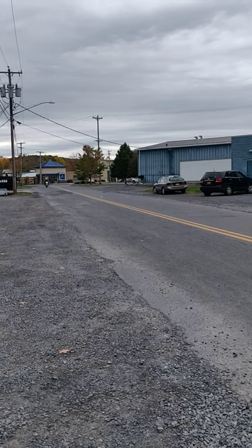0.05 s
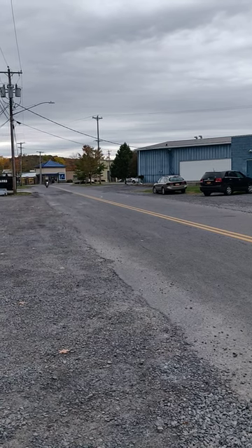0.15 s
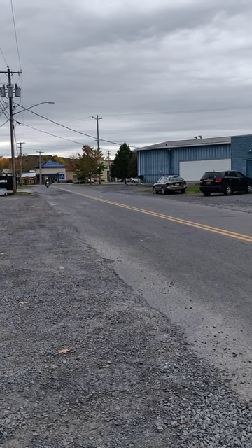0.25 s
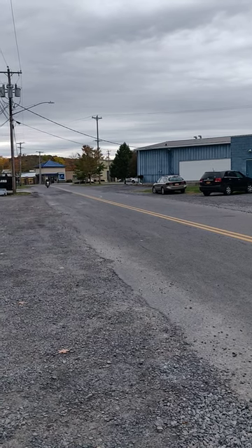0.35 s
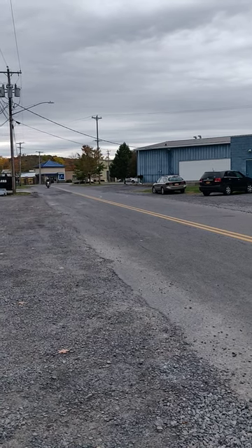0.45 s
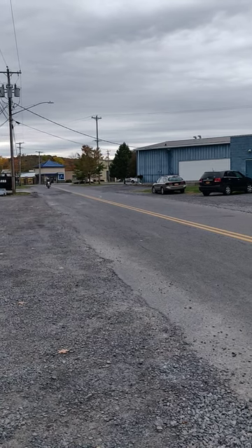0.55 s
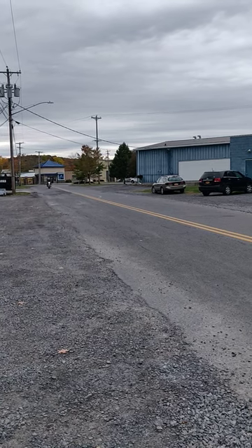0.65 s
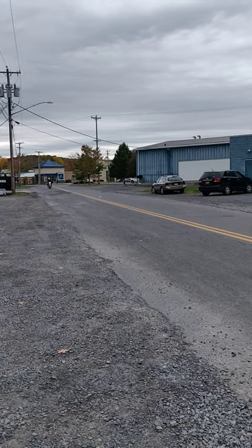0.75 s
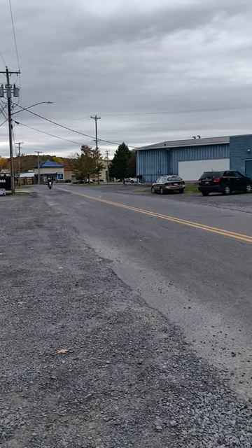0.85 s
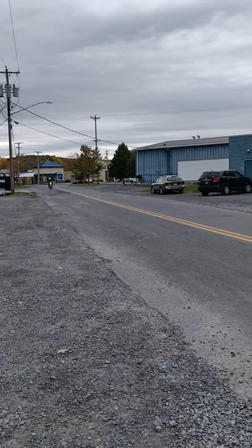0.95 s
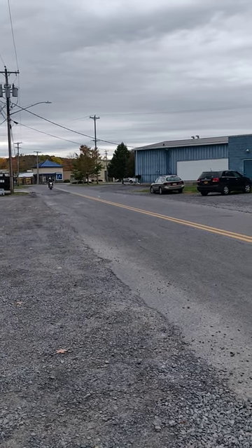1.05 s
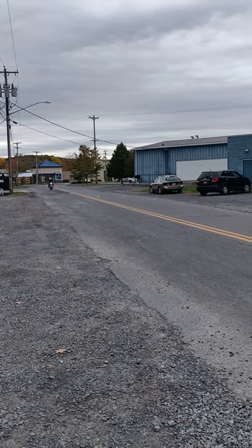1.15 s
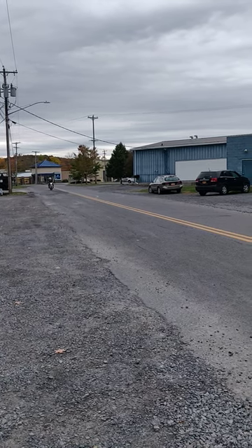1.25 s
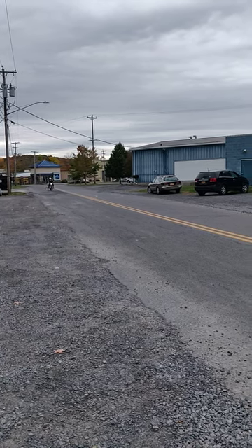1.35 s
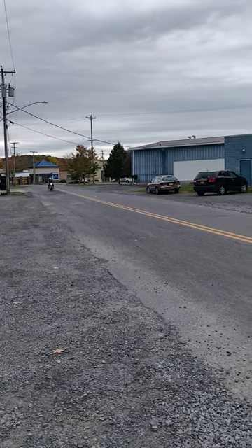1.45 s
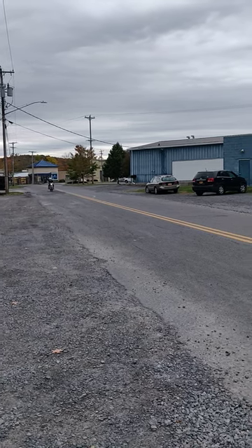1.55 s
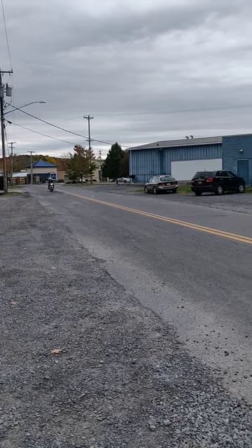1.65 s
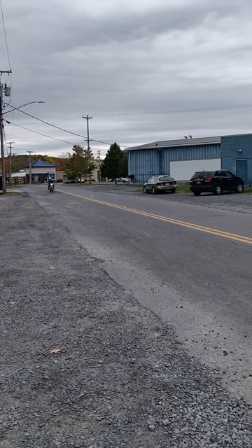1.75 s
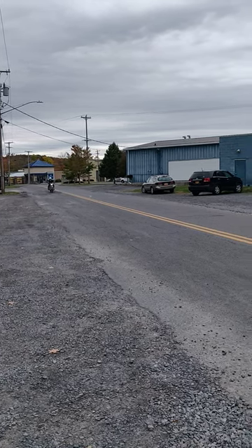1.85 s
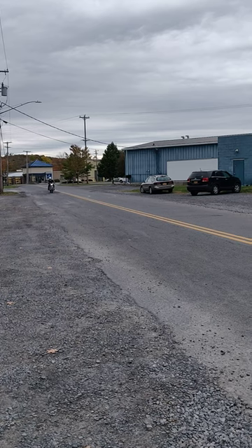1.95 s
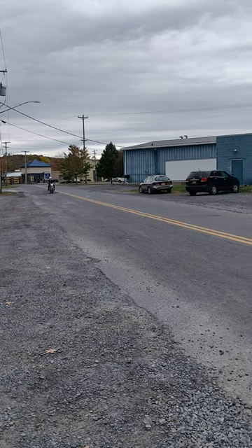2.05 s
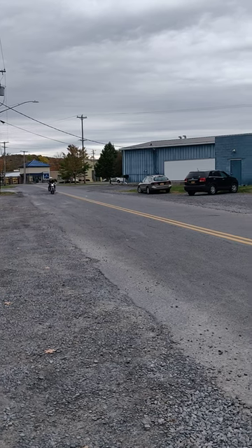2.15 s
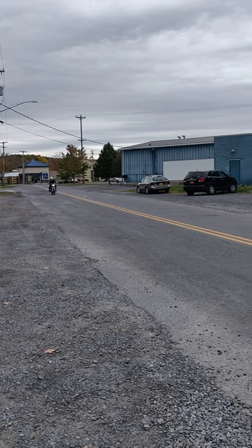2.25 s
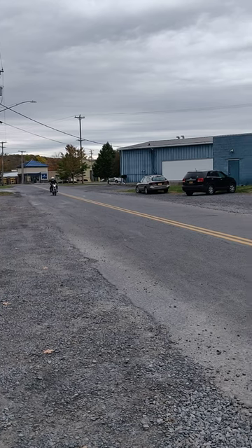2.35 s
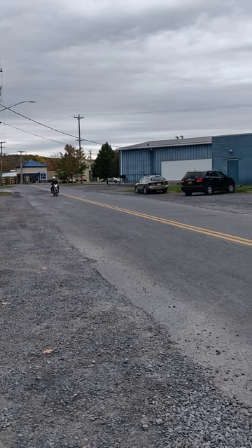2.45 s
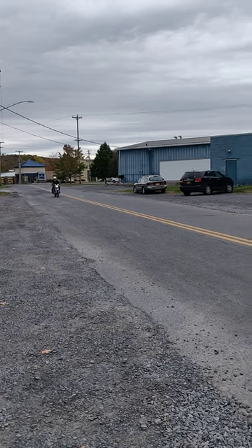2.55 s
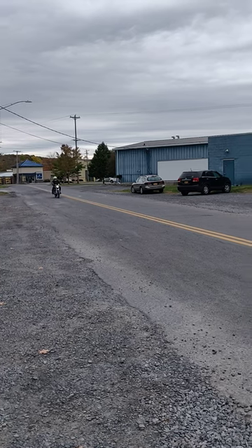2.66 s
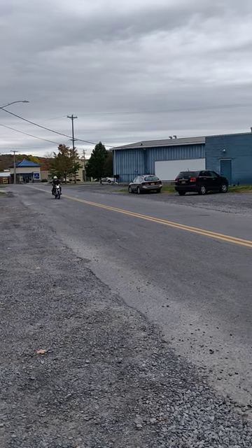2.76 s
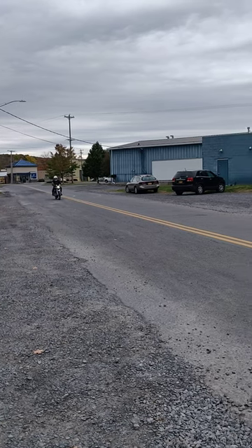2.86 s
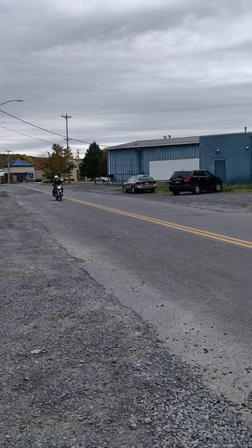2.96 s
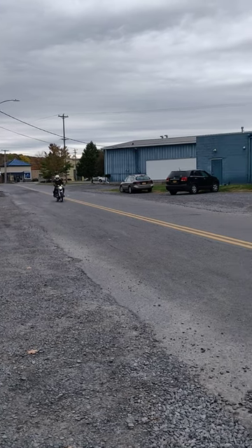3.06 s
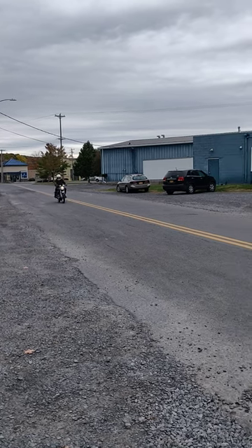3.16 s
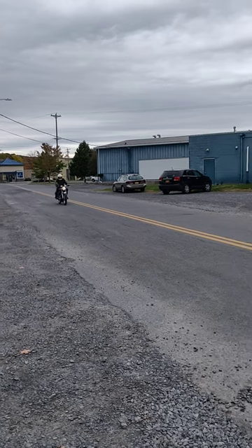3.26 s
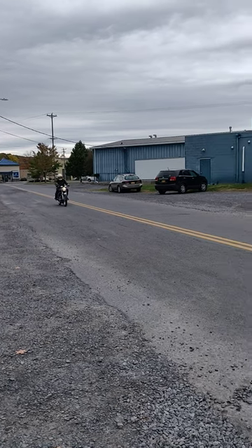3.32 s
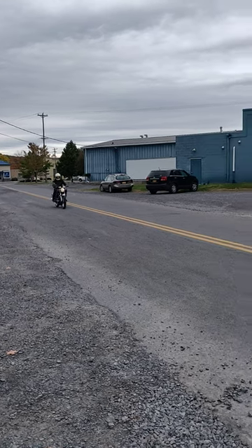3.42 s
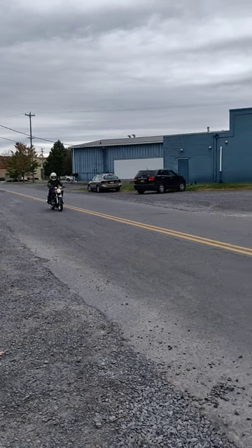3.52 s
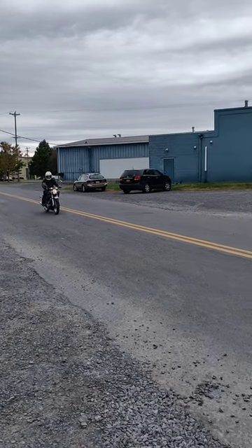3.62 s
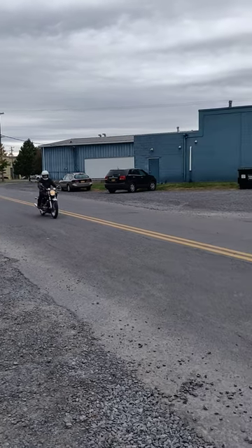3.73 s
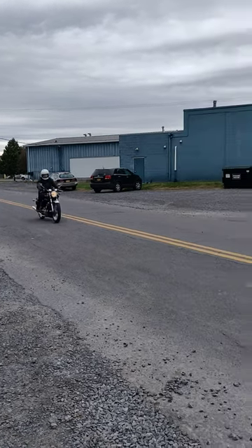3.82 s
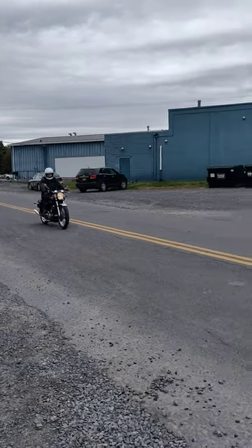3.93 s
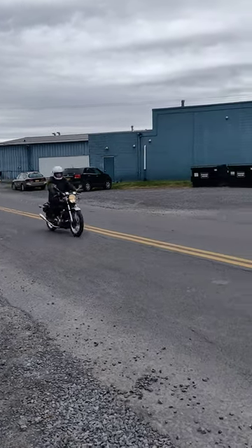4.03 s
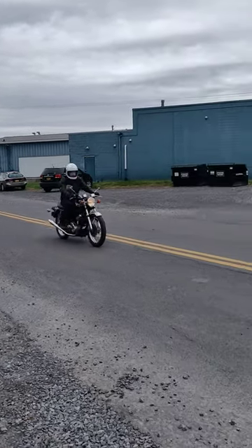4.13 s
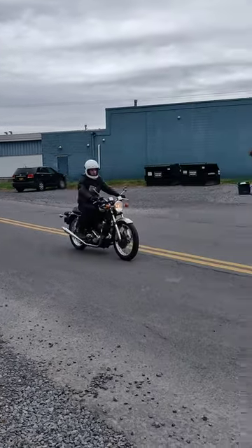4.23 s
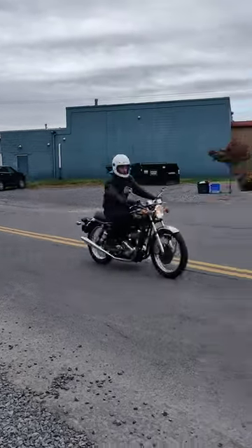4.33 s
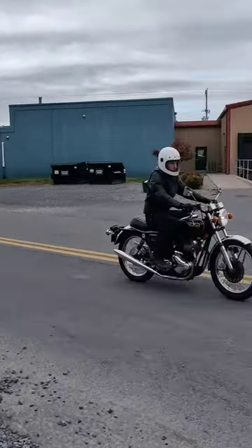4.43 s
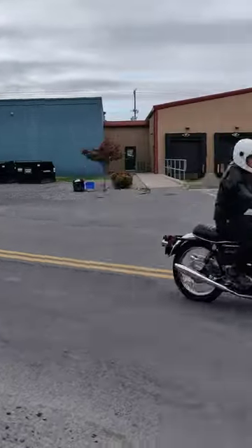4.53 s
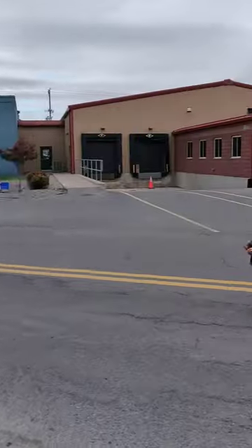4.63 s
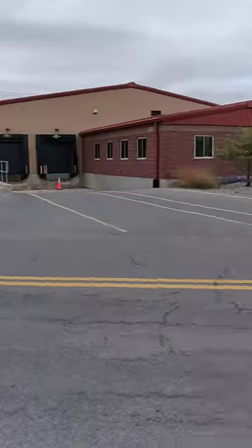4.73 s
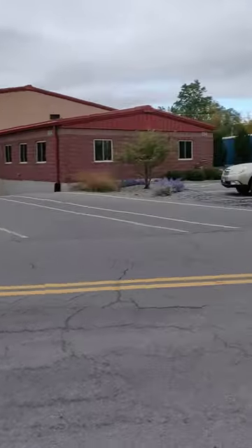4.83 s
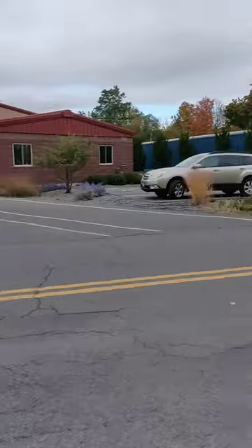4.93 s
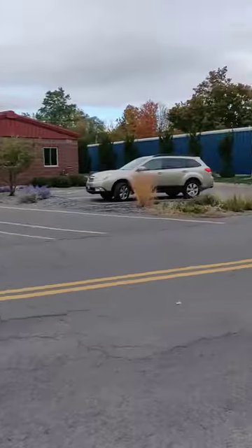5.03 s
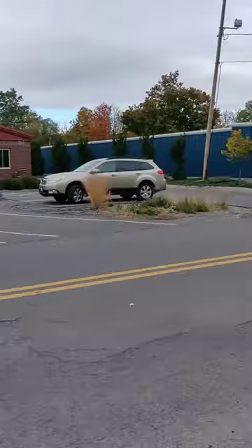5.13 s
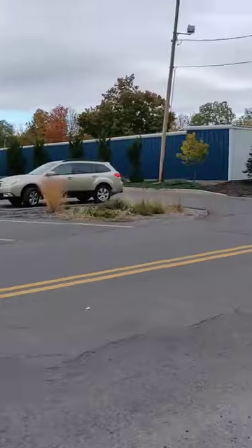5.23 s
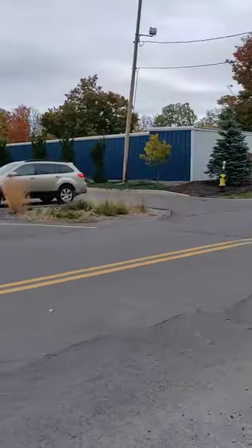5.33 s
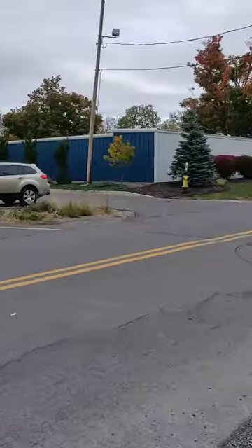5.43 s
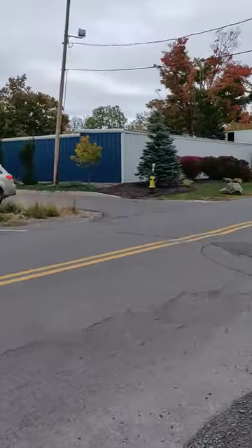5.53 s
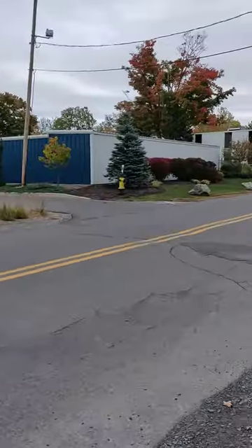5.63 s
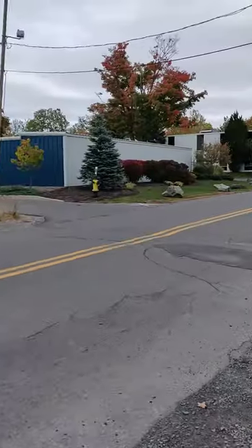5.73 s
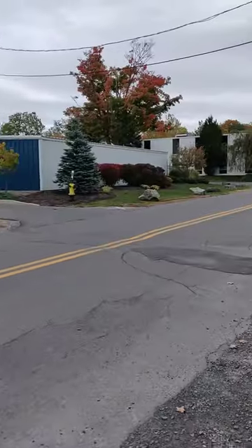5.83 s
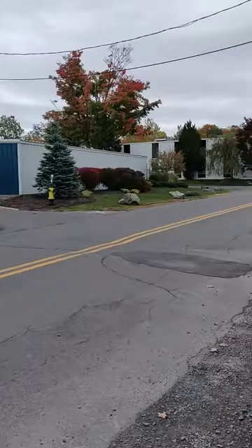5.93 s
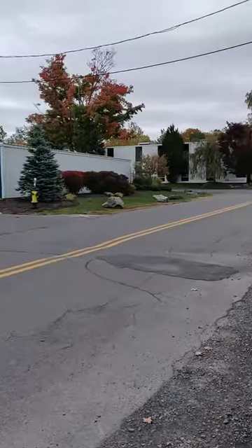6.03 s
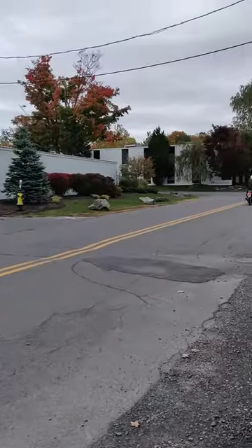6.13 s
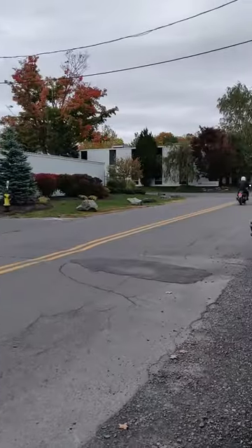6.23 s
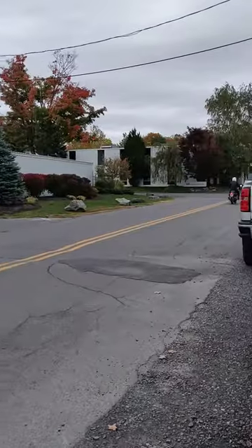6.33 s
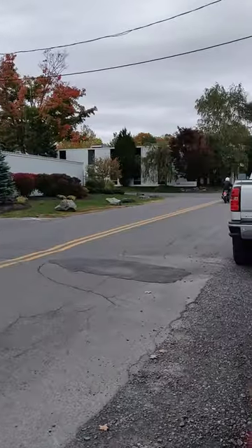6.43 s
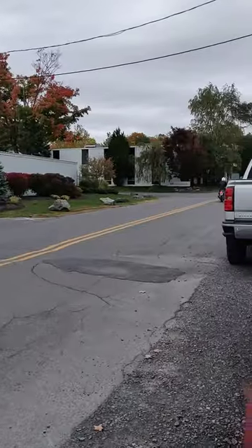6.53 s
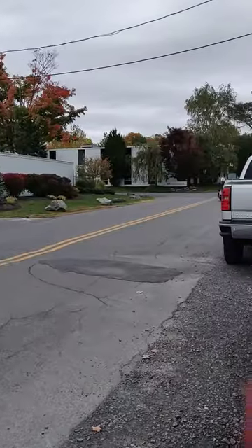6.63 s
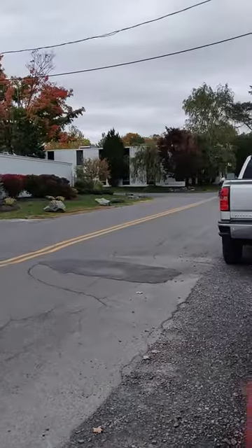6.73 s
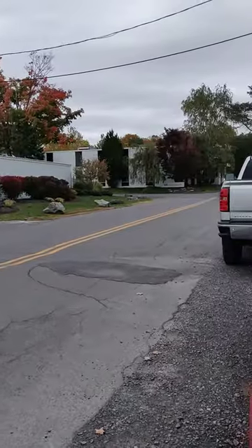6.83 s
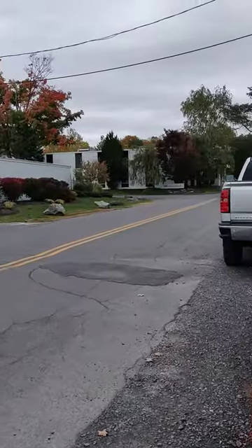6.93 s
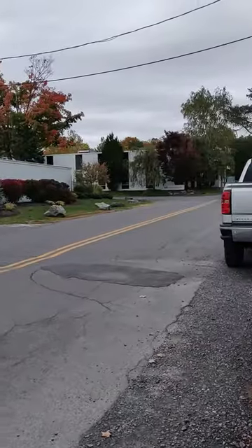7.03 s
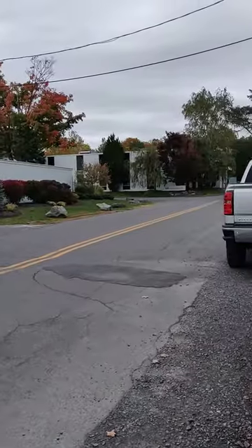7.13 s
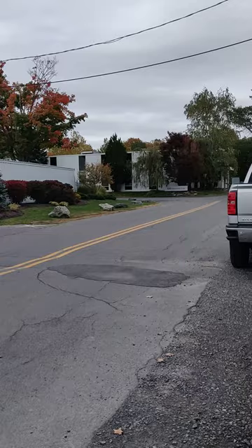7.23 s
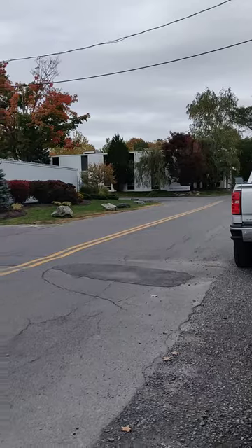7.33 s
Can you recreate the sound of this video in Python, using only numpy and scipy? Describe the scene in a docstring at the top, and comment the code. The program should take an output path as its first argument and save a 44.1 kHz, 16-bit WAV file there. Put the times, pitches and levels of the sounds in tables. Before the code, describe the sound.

A twin-cylinder motorcycle revs up a street, shifts gear, roars close past, then shuts its throttle and burbles away amid buffeting microphone wind.

```python
"""A low-geared motorcycle is heard first, coming up a street as wind rises on a hand-held camera's two microphones.
The twin-cylinder bike shifts gear, rides past close by, then shuts the throttle and leaves with an uneven burble.
Its exhaust sums multiples of the firing rate; clatter is cracks and pulsed noise; gear whine is two wavering tones.
The two ports colour sound unlike each other, and shaped noise and sharp pressure swings buffet each on its own."""
import sys
import numpy as np
from scipy import signal
from scipy.fft import rfft, irfft, next_fast_len
from scipy.io import wavfile
from scipy.ndimage import uniform_filter1d, minimum_filter1d

SR = 44100
rng = np.random.default_rng(int(sys.argv[2]) if len(sys.argv) > 2 else 0)


def pcm_store(signal):
    """Save signal as 16-bit PCM."""
    levels = np.round(np.clip(np.atleast_2d(signal), -1, 1) * 32767)
    wavfile.write(sys.argv[1], SR, levels.astype(np.int16).T)


N = 325439
SHIFT_S, ABREAST_S = 1.35, 4.35  # gear shift; bike fully abreast of the microphones


def gain_of(db):
    """Decibels to gain."""
    return 10 ** (np.asarray(db) / 20)


def evened(x):
    """Scales to rms 1 along time."""
    return x / np.sqrt(np.mean(x ** 2, axis=-1, keepdims=True) + 1e-20)


def curves(rows):
    """Columns of a table at every sample."""
    s, *columns = np.transpose(rows)
    return np.array([np.interp(np.arange(N) / SR, s, c) for c in columns])


def read(points, hz):
    """A spectrum table at the given frequencies, 30 dB lower outside its range."""
    f, value = np.transpose(points)
    return np.interp(np.log(hz + 1), np.log(f + 1), value, left=value[0] - 30, right=value[-1] - 30)


def shaped(x, gain):
    """Filters by a gain given as a function of frequency."""
    size = next_fast_len(N)
    return irfft(rfft(x, size) * gain(np.fft.rfftfreq(size, 1 / SR)), size)[..., :N]


def wander(hz, channels=1):
    """Slow chance of rms 1 with changes roughly up to hz."""
    steps = int(N / SR * hz * 4) + 9
    coarse = rng.standard_normal((channels, steps))
    for _ in range(2):
        coarse = signal.lfilter([1], [1, -.5], coarse)
    at = np.linspace(3, steps - 2, N)
    return evened(np.array([np.interp(at, np.arange(steps), c) for c in coarse]))


def ramp(start, takes):
    """Rises from 0 to 1."""
    return np.clip((np.arange(N) / SR - start) / takes, 0, 1)


def slap(hz):
    """Pressure builds on a port, drops sharply below rest and swings back."""
    u = np.arange(-512, 512) / SR * hz
    return -np.tanh(u / 0.07) * np.exp(-abs(u) / 0.7) * np.cos(2.7 * u)


# Wind on the microphone ports. Each row: time in seconds, left level in dB, right level in dB.
WIND = [(0, -46, -41), (.27, -27, -32), (.37, -34, -19.5), (.55, -34, -22.5), (.63, -37, -27),
        (1.1, -31, -20), (1.4, -27, -26.5), (1.75, -26.5, -15.5), (2, -24, -15), (2.2, -32, -14.5),
        (2.36, -23, -14.5), (2.55, -26, -13.5), (2.8, -19, -9.5), (2.95, -26, -9), (3.2, -21, -8.5),
        (3.45, -24, -12), (3.68, -24, -8.5), (4.05, -20, -20), (4.27, -7, -36), (4.4, -23, -20),
        (5, -22.5, -28), (5.38, -12.5, -16.5), (5.52, -19, -19), (5.63, -27, -21), (5.75, -22, -13.5),
        (5.85, -16, -17), (5.92, -26, -23), (6.08, -25, -17.5), (6.19, -29, -17.5), (6.27, -27, -19.5),
        (6.43, -29, -21), (6.63, -26.5, -19.5), (6.7, -25, -18), (6.77, -28, -21), (6.93, -29, -19.5),
        (7.02, -29, -19.5), (7.12, -31, -27), (7.2, -30, -19.5), (7.38, -28, -23)]
# Colour of the wind rumble. Each row: frequency in Hz, relative density in dB per Hz.
BUFFET = [(15, -16), (45, -7), (70, -9), (110, -3), (160, -5), (220, -5), (330, -11), (500, -21),
          (700, -42.5), (1200, -43.5)]
# Hard slaps of wind on one port. Each row: time in seconds, strength in dB before softening,
# port (0 left, 1 right).
SLAPS = [(1.55, -16, 1), (1.878, -14, 1), (2.343, -12, 1), (2.754, -4, 1), (2.81, -1, 1), (3.014, 5, 1),
         (3.6, -14, 1), (4.119, 0, 0), (4.309, 2, 0), (4.5, -17, 1), (5.585, -4, 0), (5.645, -10, 0),
         (5.699, -7, 0), (5.973, -11.5, 1), (6.029, -14, 0), (6.11, -10, 0), (6.312, -12, 0),
         (6.522, -12, 0), (6.594, -14, 1), (6.689, -18, 0), (6.837, -20, 0), (6.865, -13, 0),
         (7.039, -15, 0), (5.597, -7, 1), (6.002, -10, 1), (6.075, -10, 1), (6.445, -9, 1), (6.565, -13, 1),
         (6.787, -6, 1), (6.89, -6.5, 1), (6.958, -7, 1), (7.11, -14, 0), (1.784, -16, 1), (1.918, -2, 1),
         (1.956, -1.5, 1), (1.976, 2, 1), (2.176, -6, 1), (2.633, -18, 1), (2.688, 6, 1), (2.711, -5, 1),
         (2.736, -12, 1), (2.802, 3, 1), (2.847, 2, 1), (2.88, -9, 1), (2.899, -5, 1), (3.028, -2, 1),
         (3.081, -16, 1), (3.117, -28, 1), (3.178, -6, 1), (3.271, -14, 1), (3.547, 3, 1), (3.806, -10, 1),
         (4.232, -8, 0), (5.261, -4, 0), (5.386, 1, 0), (5.429, -14, 0), (5.549, -4, 1), (5.585, 3, 1),
         (5.68, -4, 1), (5.745, 3, 1), (5.788, 5, 1), (5.817, -2, 1), (5.857, 0, 0), (5.879, -2, 1),
         (5.942, -3.5, 1), (6.028, -0.5, 1), (6.155, 4, 1), (6.18, 0.5, 1), (6.203, 0.5, 1),
         (6.341, -1.5, 1), (6.689, -6, 1), (6.825, -1.5, 1), (6.907, -3, 1), (6.975, 1.5, 1),
         (7.074, -5, 1), (7.151, -3, 1), (7.209, -1.5, 1)]
GUSTY_DB, GUSTS_HZ = .8, 6  # rms unevenness and speed of the gusts
# slap pitch in Hz at 0 dB of wind, its rise per dB (stronger wind gives higher slaps), and chance spread as a
# share
SLAP_HZ, SLAP_HZ_PER_DB, SLAP_SPREAD = 384, 10, 0.21


def wind():
    """Lumpy rumble and slaps of turbulence, unrelated at the two ports; the air churns after each hard slap."""
    wind_db = curves(WIND)
    level = gain_of(wind_db + GUSTY_DB * wander(GUSTS_HZ, channels=2))
    hits, churn = np.zeros((2, 2, N + 4096))
    after = np.arange(1500) / SR
    churn_shape = np.exp(-after / 0.012) * np.minimum(after / 0.00096, 1)
    for (s, peak_db, port), chance in zip(SLAPS, rng.uniform(-1, 1, len(SLAPS))):
        at, side = round(s * SR), int(port > .5)
        hz = max(SLAP_HZ + SLAP_HZ_PER_DB * wind_db[side, at], 180) * (1 + SLAP_SPREAD * chance)
        hits[side, at - 512:at + 512] += gain_of(peak_db) * slap(hz)
        churn[side, at:at + 1500] += gain_of(peak_db - 15.0) * churn_shape
    # lesser slaps at chance moments, about 14 a second of each kind
    for hz, db in ((200, 4), (320, 1.3)):
        strength = rng.uniform(0.11, 1, (2, N)) * level * gain_of(db)
        train = (rng.random((2, N)) < 14 / SR) * strength
        hits[:, :N] += signal.oaconvolve(train, slap(hz)[None], "same", axes=1)
    lumpy = rng.standard_normal((2, N)) * gain_of(4.0 * wander(55, channels=2))
    rumble = evened(shaped(lumpy, lambda f: gain_of(read(BUFFET, f))))
    deep = evened(shaped(rng.standard_normal((2, N)), lambda f: (f / 35) / (1 + (f / 35) ** 4)))
    flutter = evened(shaped(rng.standard_normal((2, N)), lambda f: (f / 550) ** 2 / (1 + (f / 550) ** 6)))
    slaps = shaped(hits[:, :N], lambda f: 1 / (1 + (f / 800) ** 4))
    push = gain_of(-0.5) * level + churn[:, :N]
    # flutter grows with the square of the push
    return push * rumble + gain_of(-3.0) * push ** 2 * flutter + gain_of(-24.5) * level ** 0.98 * deep + slaps


def street(x):
    """Scattered echoes off the buildings, other for each port."""
    t = np.arange(SR // 2) / SR
    signs = rng.choice([-1., 1.], (2, len(t)))
    present = (rng.random((2, len(t))) < .02) * (t > .02)
    taps = signs * present * gain_of(-60 * t / .5)
    taps = taps / np.linalg.norm(taps, axis=1, keepdims=True)
    return signal.fftconvolve(x[None], taps, axes=1)[:, :N]


# Colour at the left port, for clatter and, at half these dB, for the harsh hiss.
# Each row: frequency in Hz, relative density in dB per Hz.
LEFT_PORT = [(500, -4), (700, 1.5), (900, 9.5), (1170, -4), (1500, -0.5), (1900, -8.5), (2600, -17),
             (3600, -32.5), (4450, -39.5), (5700, -48), (7500, -50), (9000, -50), (11500, -48.5),
             (16000, -72.5)]
# The same at the right port. Each row: frequency in Hz, relative density in dB per Hz.
RIGHT_PORT = [(500, 12.5), (700, -14), (900, -7), (1170, -2), (1500, -18.5), (1900, -8), (2600, -4.5),
              (3600, -18), (4450, -12), (5700, -24.5), (7500, -25.5), (9000, -20), (11500, -26),
              (16000, -39)]
# A short harsh hiss with a ring. Each row: start in seconds, length in seconds, hiss level in dB
# (right port), ring pitch in Hz, ring level in dB.
RASP = [(5.238, 0.03, -23.5, 1180, -22)]


def rasp():
    """A brief burst of hiss, brighter at the right port, and a short ring under the same envelope."""
    s, length, hiss_db, ring_hz, ring_db = RASP[0]
    t = np.arange(N) / SR - s
    shape = np.clip(t / 0.0039, 0, 1) * np.exp(-(np.maximum(t, 0) / length) ** 2)
    noise = rng.standard_normal(N)
    hiss = [evened(shaped(noise, lambda f: gain_of(.5 * read(port, f)))) for port in (LEFT_PORT, RIGHT_PORT)]
    ring = gain_of(ring_db) * np.sin(2 * np.pi * ring_hz * t)
    return shape * (gain_of(hiss_db) * np.array(hiss) * gain_of([[-4], [0]]) + ring)


# Clatter level over time: rising, then falling, with a sudden step down near 5.55 s.
# Each row: time in seconds, base level in dB.
CLATTER = [(0, -43.5), (1.08, -37.5), (1.17, -37.5), (1.5, -41), (2.2, -37.5), (2.8, -32.5), (3.15, -32),
           (3.45, -29), (4.1, -24.5), (4.4, -24.5), (4.6, -24), (5.2, -28), (5.52, -32), (5.57, -35.5),
           (5.9, -37.5), (6.3, -41.5), (6.9, -45), (7.38, -51)]
WHINE_MULTIPLE, MESH_MULTIPLE = 21.3, 45  # gear tones, in multiples of the firing rate
# main whine against the clatter; change at fully shut throttle; change in low gear, fading over 3.1 s
WHINE_OVER_DB, WHINE_SHUT_DB, WHINE_LOW_GEAR_DB = -8, -31, -5
MESH_UNDER_DB = -13.5  # higher whine against the main one, at the right port


def gear_whine(turns, throttle):
    """Gear teeth sing at fixed multiples of the firing rate, wavering; the higher tone favours the right port."""
    whine_db = (curves(CLATTER)[0] + WHINE_OVER_DB + WHINE_SHUT_DB * np.clip(1 - 0.89 * throttle, 0, 1)
                + WHINE_LOW_GEAR_DB * (1 - ramp(SHIFT_S, 3.1)))
    angle = 2 * np.pi * WHINE_MULTIPLE * turns + 1.3 * wander(6)[0]
    whine = gain_of(whine_db + 3.6 * wander(30)[0]) * np.cos(angle)
    mesh_angle = 2 * np.pi * MESH_MULTIPLE * turns + 3 * wander(14.0)[0]
    mesh = gain_of(whine_db + MESH_UNDER_DB + 2.9 * wander(12)[0]) * np.cos(mesh_angle)
    return whine + mesh * gain_of([[-12], [0]])


# Firing cracks, sharpest at high revs and close by. Each row: time in seconds,
# drive in dB over the puffed noise before the crack is filtered and throttled.
CRACK = [(0, -4), (.7, -1), (.95, 2), (1.1, 2), (1.5, -4), (3.3, -3), (3.85, 2), (4.17, 2.5), (4.3, -1),
         (7.38, -4)]
CRACK_ECHO_S, CRACK_ECHO = .0065, .5  # each crack comes again, at this gain
RING_HZ, RING_WIDTH_HZ, RING = 1550, 200, 1.2  # the cracks ring here; added gain at the peak


def firing_cracks(fired, strong, pull):
    """Each firing's impulse is spread into a downward sweep, comes again weaker, and rings."""
    def crack_filter(f):
        sweep = np.exp(1j * np.pi * f ** 2 * .0016 / 2000)  # 1.6 ms over 2000 Hz
        again = 1 + CRACK_ECHO * np.exp(-2j * np.pi * f * CRACK_ECHO_S)
        return sweep * again / (1 + (f / 1900) ** 4) / (1 + (680 / (f + 1)) ** 6)

    impulses = evened(fired * strong * gain_of(.9 * rng.standard_normal(N)))
    cracks = shaped(impulses * pull * gain_of(curves(CRACK)[0]), crack_filter)
    return shaped(cracks, lambda f: 1 + RING / (1 + 2j * (f - RING_HZ) / RING_WIDTH_HZ))


# Likeness of the noise at the two ports. Each row: frequency in Hz, left-right likeness (0 to 1).
SAME = [(500, .85), (1300, .8), (2500, .7), (5000, .35), (15000, .1)]
# Phase between the ports. Each row: frequency in Hz, lead of the left port in radians.
LEAD = [(0, 0), (1000, -.8), (1400, -1), (2000, -2.6), (2900, -1.4), (4100, -1.2), (8000, 3.5)]


def port_noises():
    """One noise reaches both ports, the right blended with its own noise and shifted in phase."""
    def same(f):
        return np.clip(np.interp(f, *np.transpose(SAME)), 0, 1)

    a, b = rng.standard_normal((2, N))
    shared = shaped(a, lambda f: same(f) * np.exp(-1j * np.interp(f, *np.transpose(LEAD))))
    return [a, shared + shaped(b, lambda f: np.sqrt(1 - same(f) ** 2))]


# Balance of the clatter. Each row: time in seconds, left minus right in dB,
# left treble over the clatter in dB, right treble over the clatter in dB.
COLOUR = [(0, 1, -23, -17), (1, -1.5, -25, -21), (1.6, -1, -22.5, -15.5), (2.8, 0, -28, -15.5),
          (3.4, 5, -30.5, -12.5), (4.15, 1, -28, -11.5), (4.5, -1.5, -20.5, -12), (4.75, 6.5, -22, -10.5),
          (5.3, 1, -14.5, -9), (5.8, 4, -15.5, -7.5), (7.38, 4, -18.5, -7.5)]
TREBLE_HZ, AIR_HZ = 3600, 10500  # where treble and highest treble begin
# valve ticks, two a firing: level over the treble, chance spread, decay as a share of a beat
TICK_DB, TICK_SPREAD_DB, TICK_SHARE = -1, 3.2, .14


def clatter(turns, throttle):
    """A crack at each firing under throttle, over noise puffed at the same beat; treble flickers more than body."""
    lean_db, left_top, right_top = curves(COLOUR)
    left_db, right_db = curves(CLATTER) + [lean_db / 2, -lean_db / 2]
    pull = np.clip(throttle, 0, 1)
    # every other crack is stronger; the alternation skips one step at the shift
    strong = 1 + .22 * np.cos(np.pi * (np.floor(turns) + (ramp(SHIFT_S, 1) > 0)))
    puff = 1 + (.3 + .35 * pull) * strong * np.exp(-(turns % 1) / .25)
    puff /= np.sqrt(uniform_filter1d(puff ** 2, SR // 10))
    fired = np.diff(np.floor(turns), prepend=0)
    cracks = firing_cracks(fired, strong, pull)
    beat = 2 * turns
    tick_gain = gain_of(TICK_DB + TICK_SPREAD_DB * rng.standard_normal(N))[beat.astype(int)]
    ticks = 1 + tick_gain * np.exp(-(beat % 1) / TICK_SHARE)
    pair = port_noises()
    flicker, shimmer = wander(40, channels=2)
    out = []
    for x, port, db, top_db in zip(pair, (LEFT_PORT, RIGHT_PORT), (left_db, right_db), (left_top, right_top)):
        body = shaped(x * puff + cracks, lambda f: gain_of(read(port, f)) / (1 + (f / TREBLE_HZ) ** 8))
        top = shaped(x * puff ** .5 * ticks,
                     lambda f: gain_of(read(port, f)) / (1 + (TREBLE_HZ / (f + 1)) ** 8))
        top = evened(top)
        air = shaped(top, lambda f: 1 / (1 + (AIR_HZ / (f + 1)) ** 8))
        # distance dulls the highest treble fastest; the treble level stands for distance
        kept = gain_of(np.maximum(1.38 * (db + top_db + 42.0), -22))
        top = top + air * (kept - 1)
        out.append(gain_of(db + 1.5 + 1.12 * flicker) * evened(body)
                   + gain_of(db + top_db + 1.52 * shimmer) * top)
    return np.array(out)


# Clatter colour by the bike's bearing. Each row: frequency in Hz, close ahead left in dB,
# close ahead right in dB, gone past left in dB, gone past right in dB.
BEARING = [(500, -8, 1, -5, -2), (730, -0.5, 3.5, -3, 5.5), (856, -3, -1, -6, 8.5),
           (1190, -2, 1.5, 0.5, -2.5), (1605, -4, 6.5, -3, 13), (1810, -13.5, -6, 2.5, 2),
           (2660, 2, 1, -2.5, -1), (3330, -4.5, -0.5, -2, 2), (4500, 3.5, -3, -6, -2.5),
           (6100, 2.5, 0.5, 1.5, 3), (7800, -10, -1.5, -7, 4.5), (8930, -12, 1.5, -5, 3),
           (11900, -2, -7, -3, -4), (15500, -3, 0, -11, 13)]
CLOSING, PASSING = (2.53, 1), (4.68, 0.086)  # (start s, takes s)


def turned(x):
    """Recolours the two ports as the bike draws close and goes past."""
    hz, t, z = signal.stft(x, SR, nperseg=512)
    past = np.clip((t - PASSING[0]) / PASSING[1], 0, 1)
    close = np.clip((t - CLOSING[0]) / CLOSING[1], 0, 1) * (1 - past)
    f, *columns = np.transpose(BEARING)
    db = np.array([np.interp(hz, f, c) for c in columns])[..., None]
    return signal.istft(z * gain_of(db[:2] * close + db[2:] * past), SR, nperseg=512)[1][:, :N]


# The rider's hand. Each row: start in seconds, time taken in seconds, throttle reached (0 to 1),
# unevenness of the two cylinders in dB from then on.
THROTTLE = [(-1, .1, .9, 0), (1.08, .025, .08, 0), (1.46, .1, .85, -3), (3.2, .3, .85, -2),
            (4.02, .2, .82, 2.5), (4.755, .03, .08, -5), (5.45, .3, .1, 0)]


def hand():
    """Throttle and unevenness move from each setting to the next."""
    start, takes, *settings = np.transpose(THROTTLE)
    return np.diff(settings, prepend=0) @ np.array([ramp(s, d) for s, d in zip(start, takes)])


def causal(note):
    """Complex heights with the least phase the whole multiples allow: a sudden start, ringing after."""
    k, db = np.transpose(note)
    axis = np.linspace(0, 64, 1025)
    whole_db = np.interp(axis, np.r_[0, k[1::2], 30], np.r_[-40, db[1::2], -55])
    log_gain = np.log(gain_of(whole_db))
    phase = -signal.hilbert(np.r_[log_gain, log_gain[-2:0:-1]]).imag
    late = np.pi * (k % 1)  # half multiples in quadrature: every other pulse comes late, not loud
    return dict(zip(k, gain_of(db) * np.exp(1j * (np.interp(k, axis, phase[:len(axis)]) - late))))


# Exhaust note in low gear; half multiples come from the cylinders being unlike.
# Each row: multiple of the firing rate, relative level in dB.
LOW_GEAR = [(0.5, -20), (1, -7), (1.5, -20), (2, -2.5), (2.5, -11), (3, 0), (3.5, -22), (4, -1.5),
            (4.5, -11), (5, -1), (5.5, -20), (6, -5), (6.5, -17), (7, -7), (7.5, -25), (8, -12), (8.5, -30),
            (9, -20), (9.5, -40), (10, -34)]
# Exhaust note in high gear. Each row: multiple of the firing rate, relative level in dB.
HIGH_GEAR = [(0.5, -40), (1, -17), (1.5, -24), (2, -7), (2.5, -12), (3, 0), (3.5, -12), (4, -10),
             (4.5, -10), (5, -1), (5.5, -12), (6, -3.5), (6.5, -14), (7, -11), (7.5, -15), (8, -6),
             (8.5, -13), (9, -8), (9.5, -20), (10, -14)]
# Exhaust note heard from the side. Each row: multiple of the firing rate, relative level in dB.
ALONGSIDE = [(0.5, -29), (1, -9.5), (1.5, -14), (2, -5), (2.5, 0.5), (3, 4.5), (3.5, -0.5), (4, -8),
             (4.5, 0.5), (5, -1), (5.5, 1.5), (6, -1), (6.5, -3), (7, -2), (7.5, -33), (8, -4), (8.5, -13),
             (9, -8.5), (9.5, -28), (10, -16.5)]
# Exhaust note with the throttle shut. Each row: multiple of the firing rate, relative level in dB.
OVERRUN = [(.5, -32), (1, -16), (1.5, -12), (2, 0), (2.5, -8), (3, -15), (3.5, -19), (4, -24), (4.5, -13),
           (5, -8), (5.5, -15), (6, -26), (6.5, -30), (7, -28), (7.5, -22), (8, -28)]
# the note is extra ragged (rms) after the shift, then evens out from (start s, takes s)
ROUGH_DB, ROUGH_RADIANS, SMOOTHING = .5, .3, (3.4, .5)
DIP_HZ, DIP_WIDTH_HZ, DIP_DB = 184, 10, -6  # the pipes pass little at this pitch in low gear


def exhaust(turns, level_db, throttle, uneven_db):
    """Multiples of the firing rate line up into one pulse a firing; a shut throttle booms."""
    t, hz = np.arange(N) / SR, np.gradient(turns) * SR
    low = np.clip((SHIFT_S - t) / 0.1, 0, 1)
    near = np.clip(1 + (t - ABREAST_S) / 0.32, 0, 1)  # the side note stays once abreast
    pull = np.clip(throttle, 0, 1)
    low_gear, high_gear, alongside, overrun = map(causal, (LOW_GEAR, HIGH_GEAR, ALONGSIDE, OVERRUN))
    rough = ramp(SHIFT_S, .2) - ramp(*SMOOTHING)
    out, uneven = np.zeros(N), gain_of(uneven_db)
    for k in low_gear:
        dip = gain_of(DIP_DB * np.exp(-((k * hz - DIP_HZ) / DIP_WIDTH_HZ) ** 2))
        open_note = low * dip * low_gear[k] + (1 - low - near) * high_gear[k] + near * alongside[k]
        height = pull * open_note + (1 - pull) * overrun.get(k, 0)
        if k % 1:
            height = height * uneven
        height = height * gain_of((2 + ROUGH_DB * rough) * wander(18)[0])
        angle = 2 * np.pi * k * turns + (.18 + ROUGH_RADIANS * rough) * wander(18)[0]
        out += height.real * np.cos(angle) - height.imag * np.sin(angle)
    power = uniform_filter1d(out ** 2, SR // 12)
    return out / np.sqrt(power + 1e-9) * gain_of(level_db + .9 * wander(25)[0])


# The ride up the street. Each row: time in seconds, firings in Hz as heard, exhaust base level in dB.
RIDE = [(0, 63, -18.5), (.084, 64.17, -23.5), (.46, 67.53, -22), (.8, 69.3, -20), (1.08, 70.74, -20),
        (1.3, 57.6, -17), (1.42, 50.7, -18.5), (1.54, 48.1, -20), (1.7, 51.16, -18), (2.3, 52.33, -19),
        (3.1, 53.2, -17.5), (3.4, 54, -15), (3.7, 54.85, -12.5), (4.25, 56.02, -9), (4.6, 54.79, -11.5),
        (4.8, 50.77, -11), (4.95, 50.27, -10.5), (5.15, 48.5, -13.5), (5.4, 46.48, -16),
        (5.58, 45.08, -18.5), (5.68, 44, -21.5), (5.9, 42, -27.5), (6.2, 40.14, -22), (6.35, 39.28, -27.5),
        (6.45, 38.44, -24.5), (6.8, 36.05, -20.5), (6.95, 34.46, -27), (7.38, 31, -33)]
# slight lean of the exhaust to the right late on: left minus right, and (start s, takes s)
LEAN_BEFORE_DB, LEAN_AFTER_DB, LATE = 0, -2, (5.55, 0.4)
FALTER_DB = 2  # rms unevenness as the exhaust of the departing bike burbles


def scene():
    """Motorcycle, street and wind at the two microphone ports."""
    hz, level_db = curves(RIDE)
    throttle, uneven_db = hand()
    turns = np.cumsum(hz) / SR  # firings so far
    level_db = level_db + FALTER_DB * ramp(*LATE) * wander(15)[0]
    pipe = exhaust(turns, level_db, throttle, uneven_db)
    # the left port takes less of the exhaust's higher range
    left_pipe = shaped(pipe, lambda f: 1 - 0.53 / (1 + (330 / (f + 1)) ** 4))
    lean_db = LEAN_BEFORE_DB + (LEAN_AFTER_DB - LEAN_BEFORE_DB) * ramp(*LATE)
    direct = np.array([left_pipe, pipe]) * gain_of([lean_db / 2, -lean_db / 2])
    bike = direct + gain_of(-13.0) * street(pipe)
    engine = gear_whine(turns, throttle) + turned(clatter(turns, throttle))
    return bike + engine + wind() + rasp()


EDGE_HZ = 15750  # upper band limit


def record(dry):
    """A quick limiter holds each port's peaks under the ceiling; then the band limit."""
    ceiling, span = .89, 221  # full scale is 1; span in samples
    room = minimum_filter1d(np.minimum(ceiling / (abs(dry) + 1e-9), 1), span)
    held = dry * uniform_filter1d(uniform_filter1d(room, span // 2), span // 2)
    band = signal.firwin(511, EDGE_HZ, window=("kaiser", 9), fs=SR)
    return signal.oaconvolve(held, band[None], "same")


dry = scene()
out = record(dry)
pcm_store(out)
```